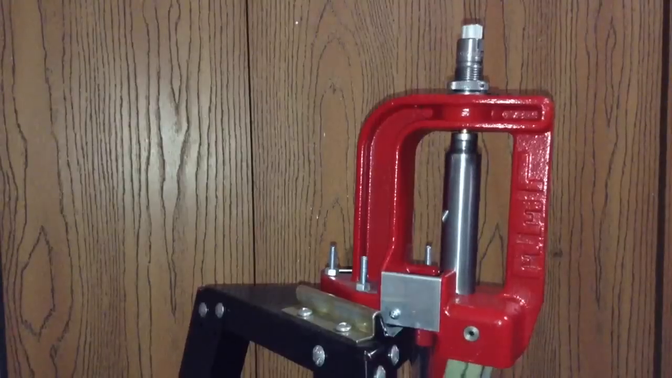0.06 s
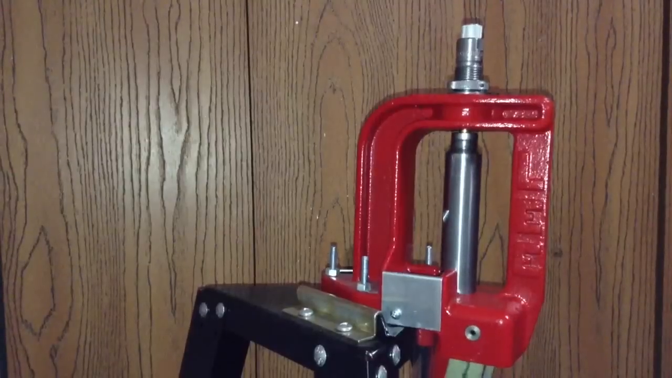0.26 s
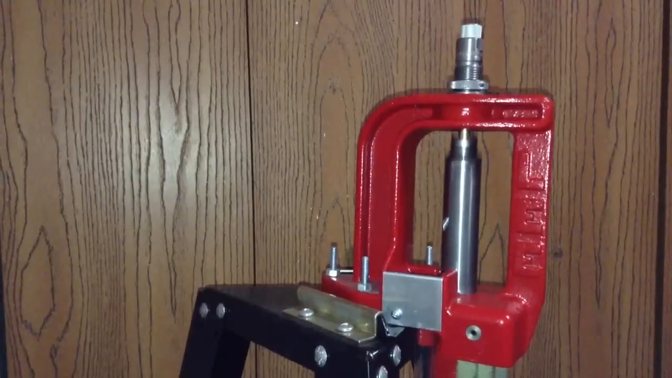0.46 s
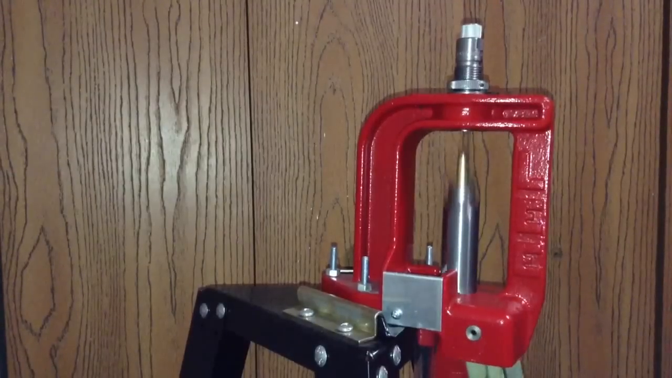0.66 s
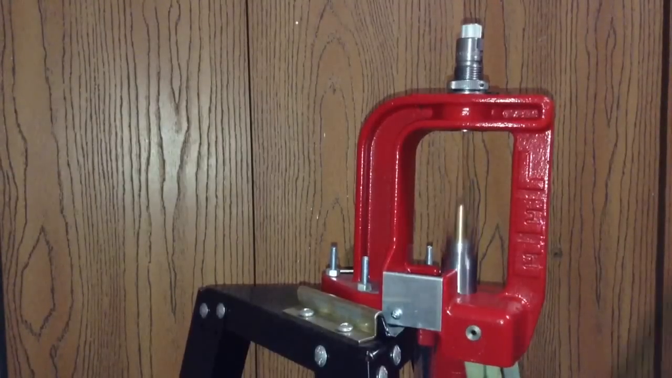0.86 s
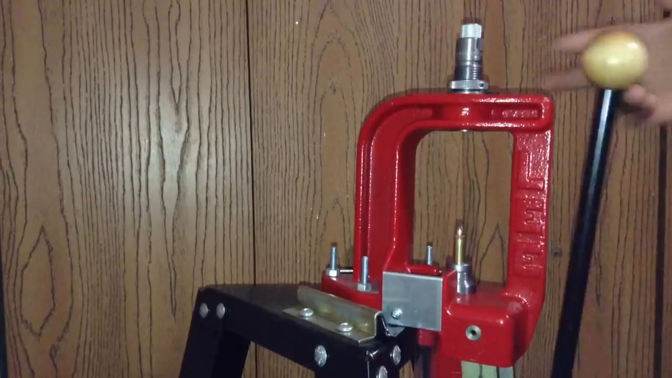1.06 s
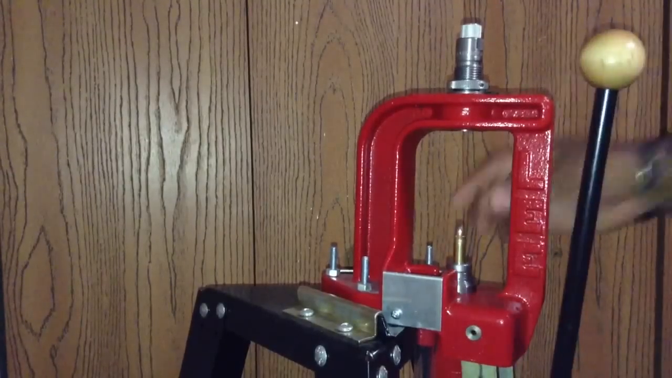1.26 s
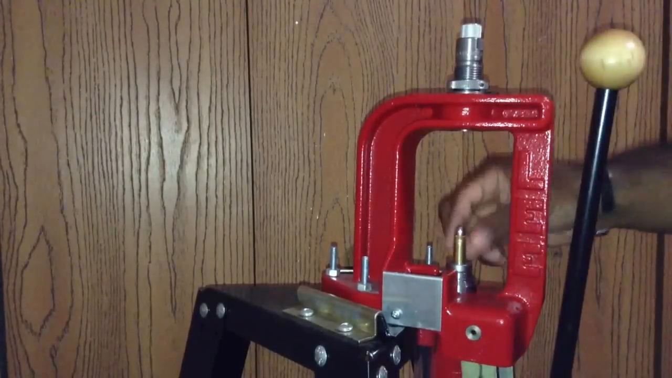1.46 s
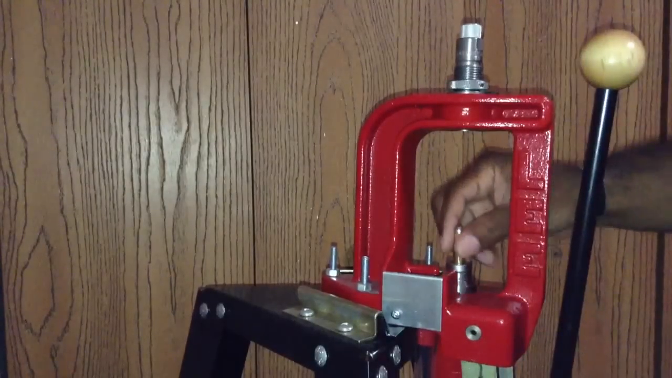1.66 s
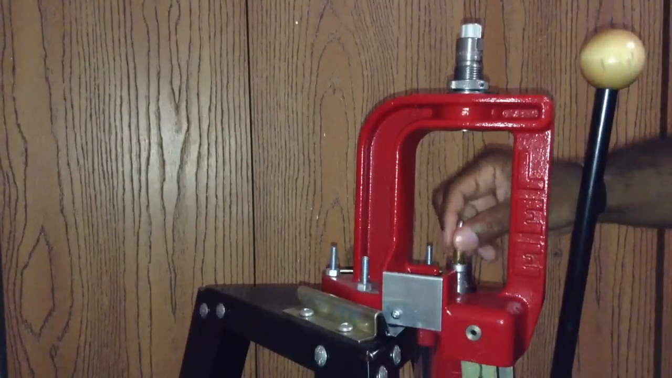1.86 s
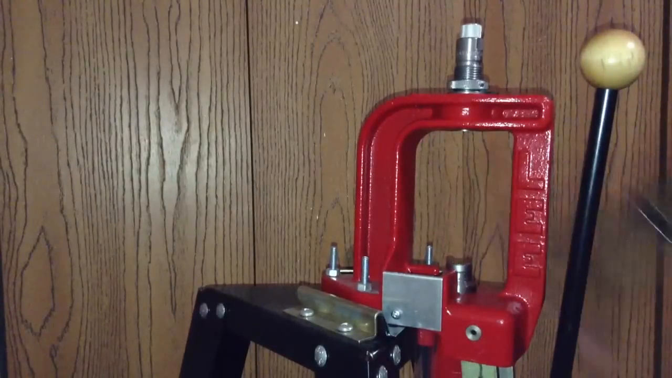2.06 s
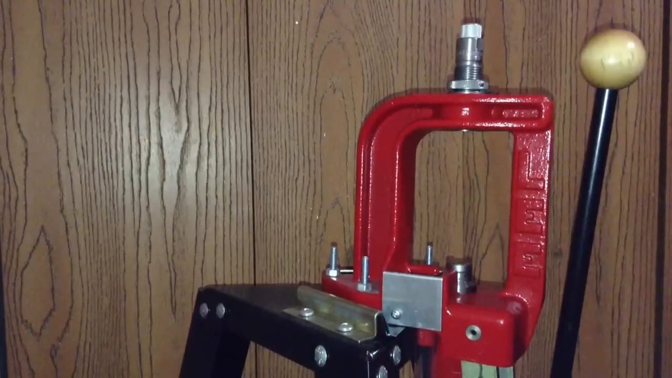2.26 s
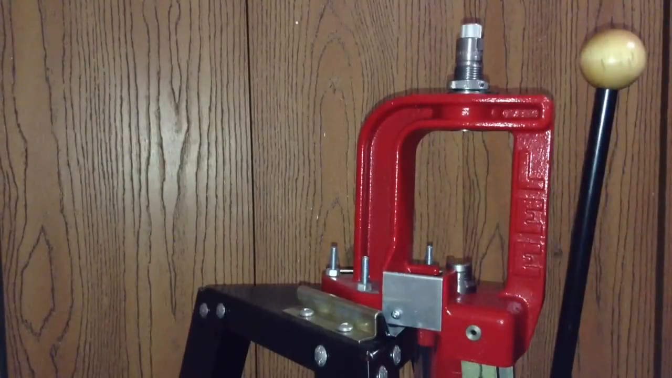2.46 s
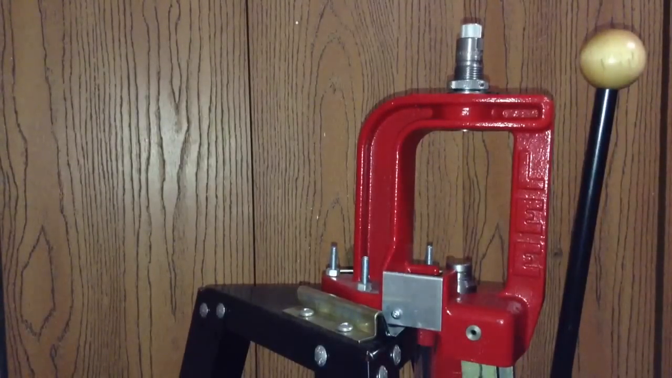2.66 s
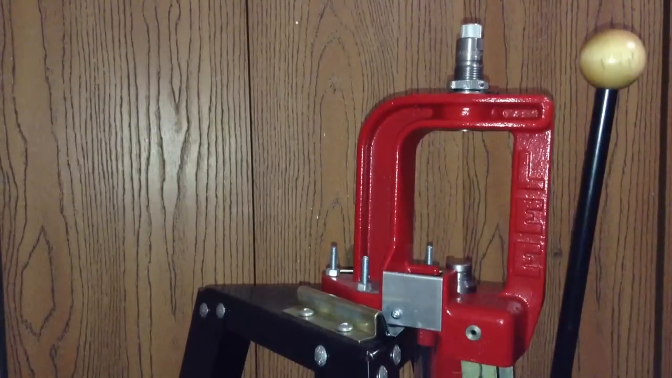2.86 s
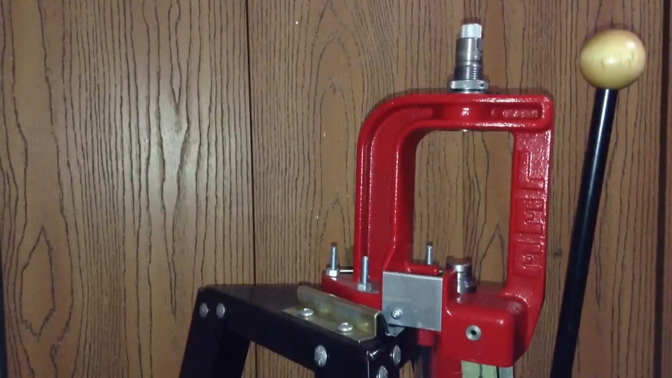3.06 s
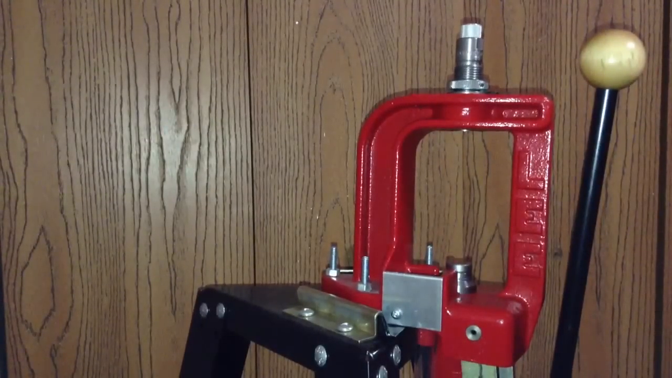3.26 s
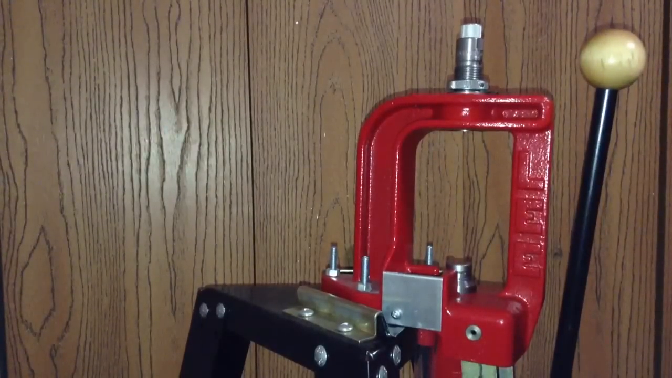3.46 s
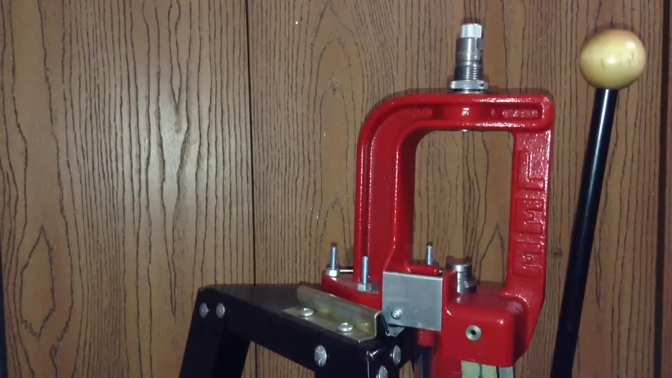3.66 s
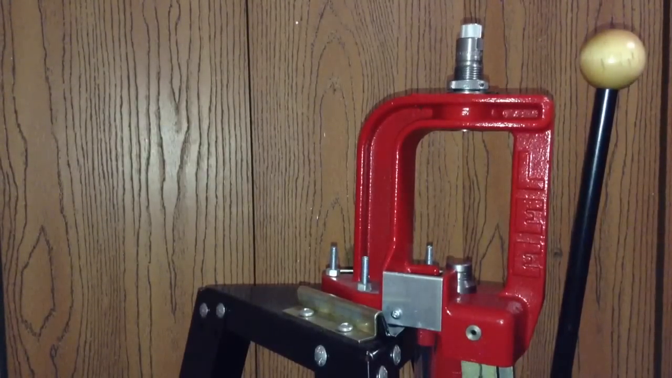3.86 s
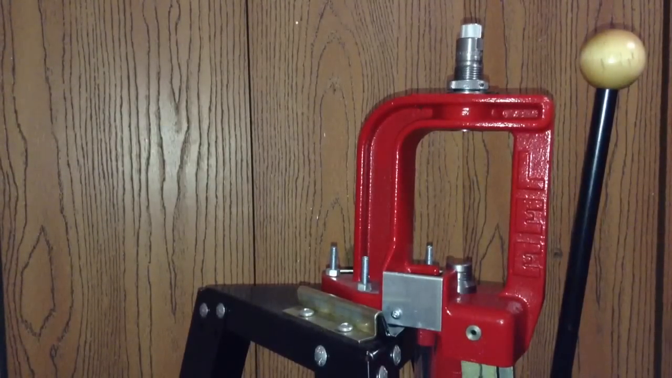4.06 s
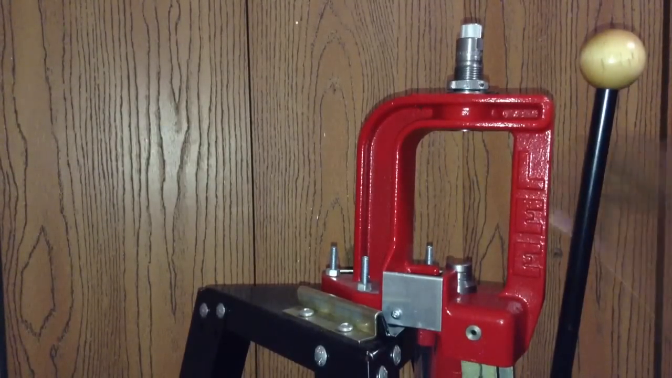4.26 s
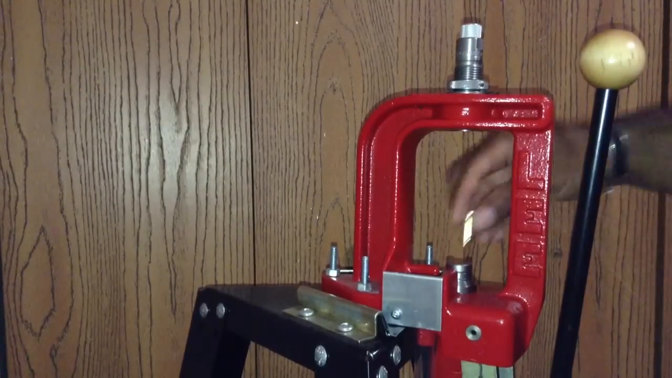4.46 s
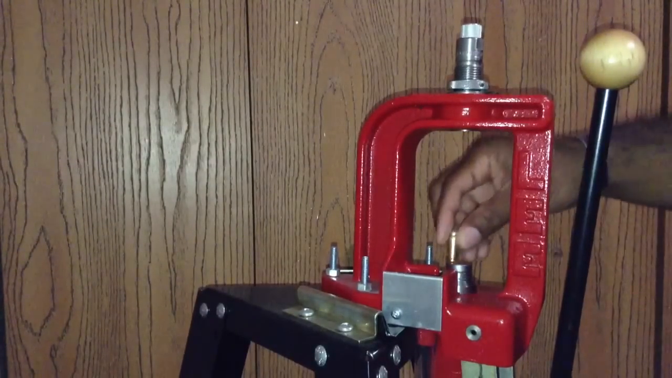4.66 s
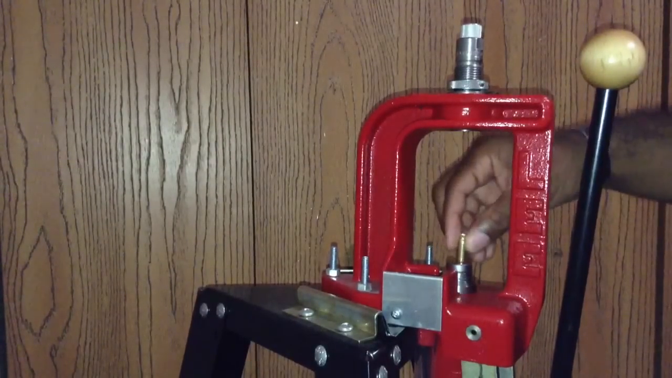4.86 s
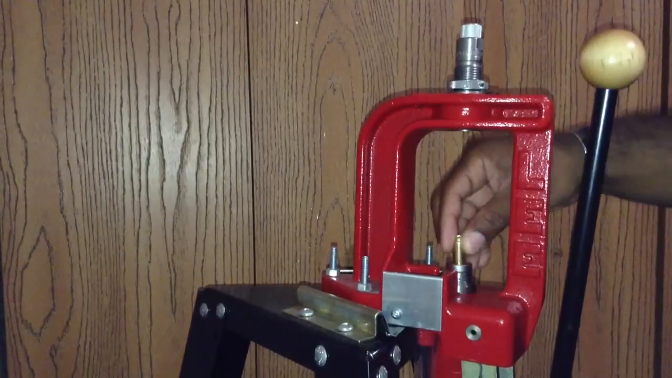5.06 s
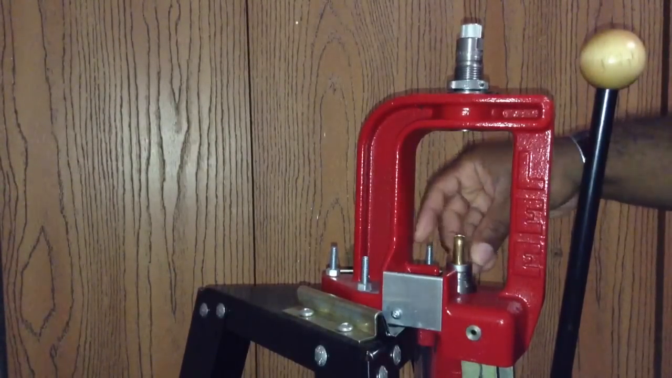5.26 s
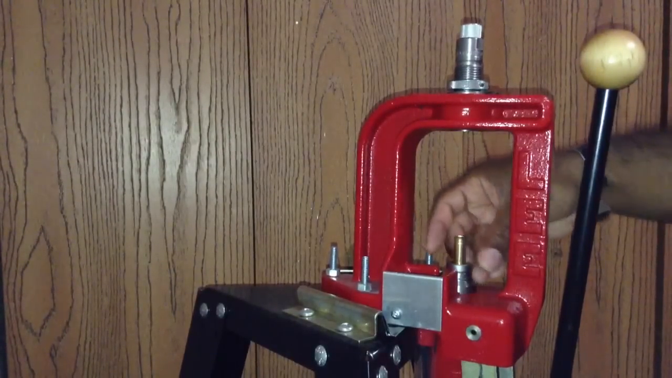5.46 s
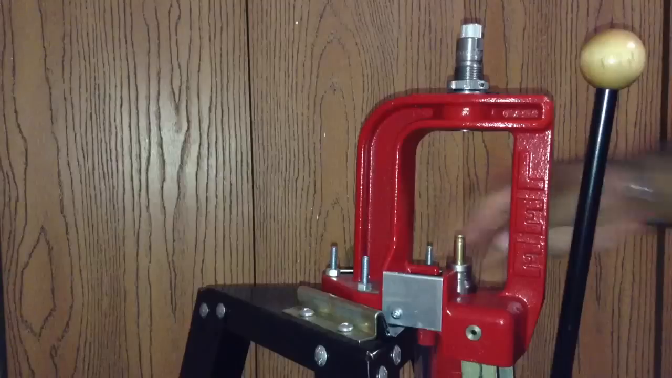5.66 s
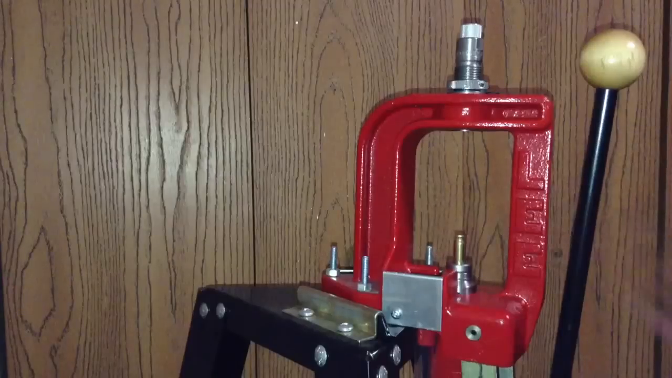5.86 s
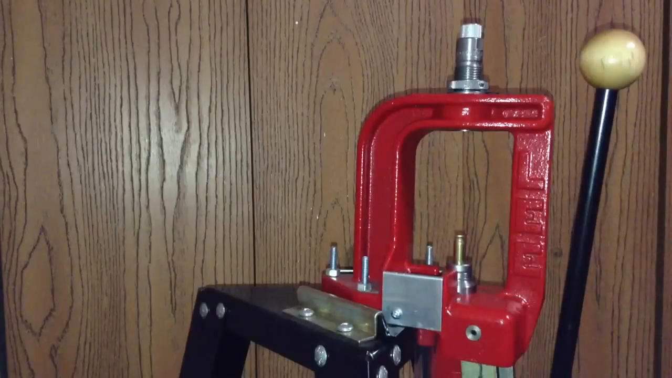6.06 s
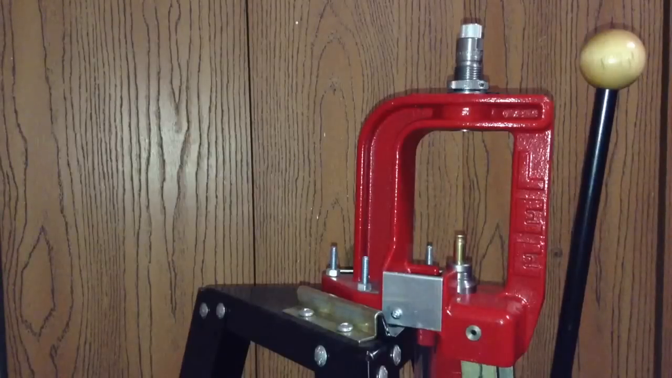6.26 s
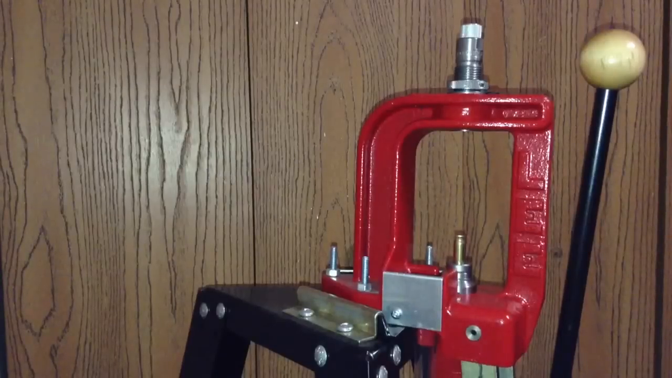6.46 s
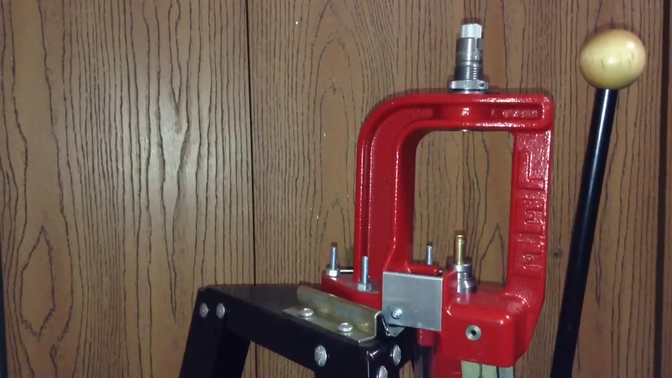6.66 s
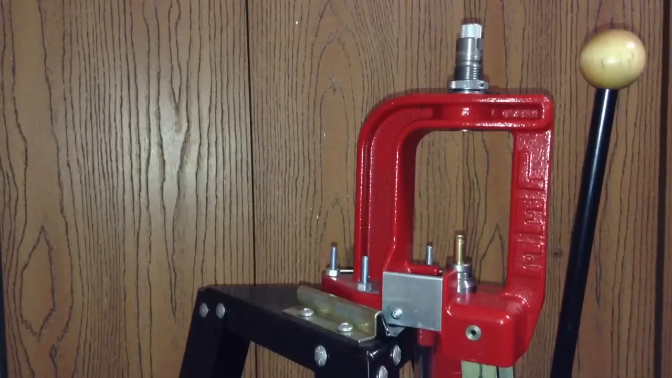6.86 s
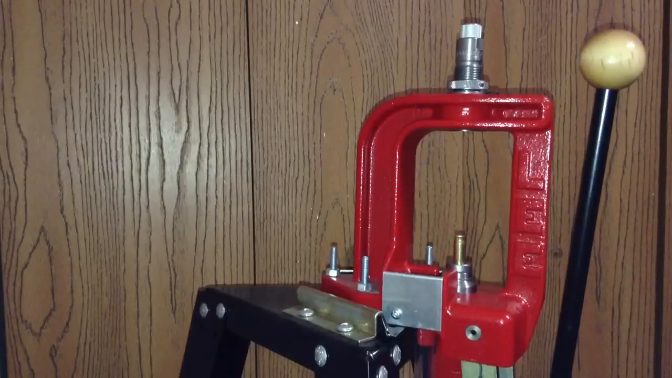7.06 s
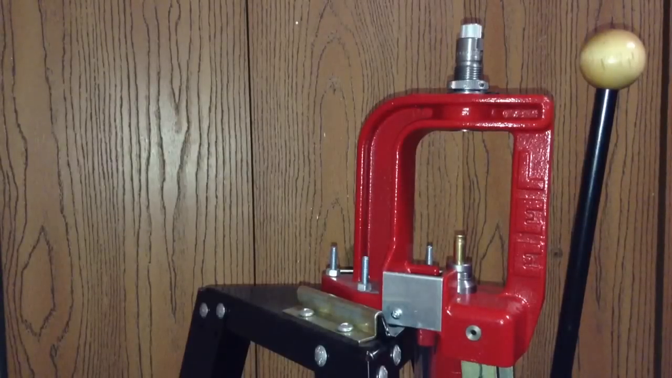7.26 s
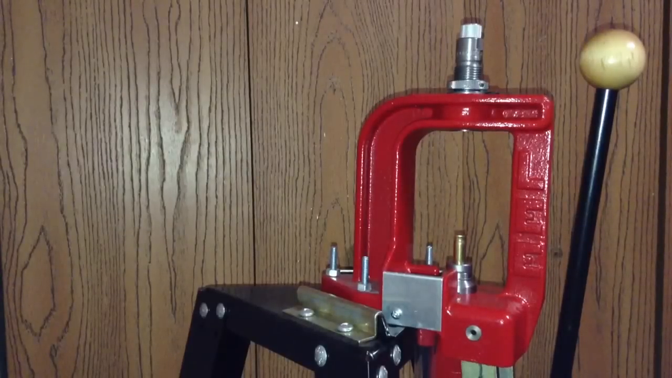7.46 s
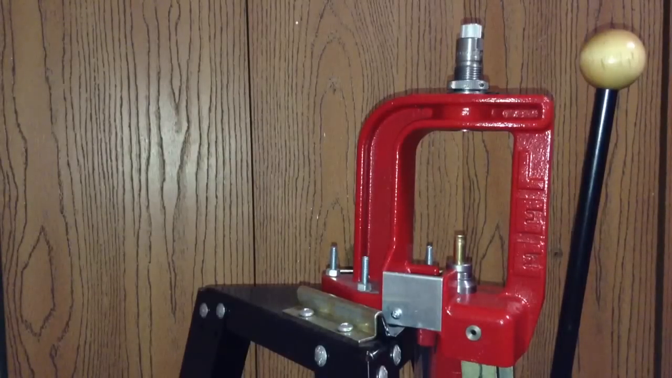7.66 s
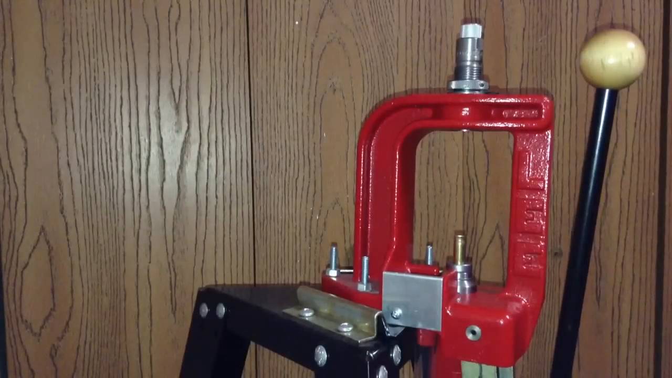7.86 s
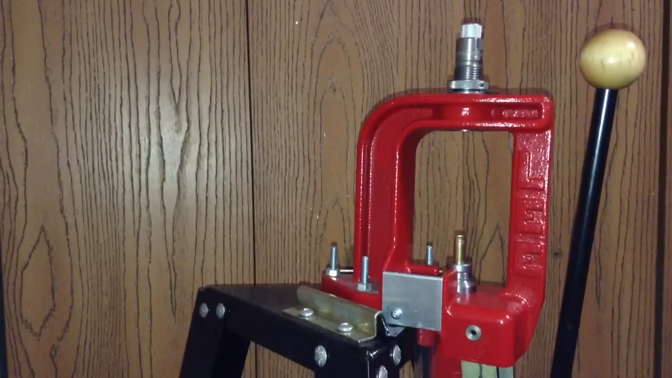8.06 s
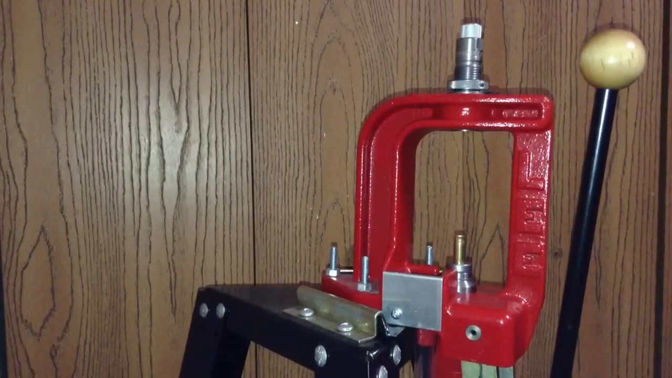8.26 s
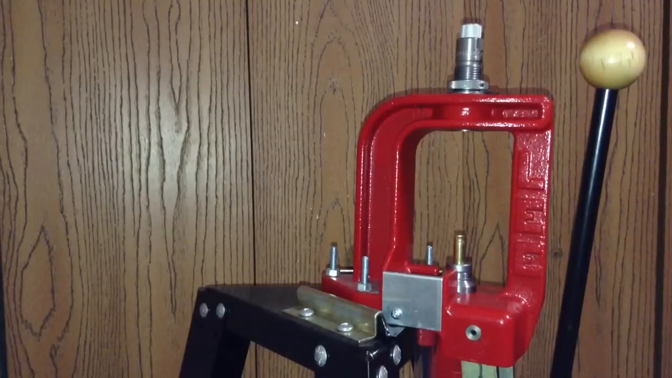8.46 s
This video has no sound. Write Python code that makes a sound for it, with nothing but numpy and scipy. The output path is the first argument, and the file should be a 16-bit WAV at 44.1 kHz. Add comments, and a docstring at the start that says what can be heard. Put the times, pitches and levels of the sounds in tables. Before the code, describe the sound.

Metal press clunks free with a tiny squeak, ram slides to a loud clang, then brass clicks, wooden bench knocks and faint cloth rustle.

```python
"""A clunk and a brief squeak: the ram of a steel-stand reloading press breaks free in a small panelled room.
It slides down and the handle hits its stop; brass clicks in the shell holder, things knock on the bench,
the next case goes in, then clothes rustle. Contacts are decaying noise shaped by a spectrum plus sine modes;
sliding and cloth are filtered trains of slips; the squeak is a wavering sine. Rumble and hiss run throughout.
"""
import sys
import numpy as np
from scipy import signal
from scipy.fft import rfft, irfft
from scipy.io import wavfile
from scipy.ndimage import uniform_filter1d

SR = 44100
rng = np.random.default_rng(int(sys.argv[2]) if len(sys.argv) > 2 else 0)


def materialize(psi):
    """Save the field psi as 16-bit PCM at rate SR to the path in sys.argv[1].

    A 1-D psi becomes a single channel; in a 2-D psi each row is a channel.
    """
    bounded = np.clip(np.atleast_2d(psi).T, -1, 1)
    quanta = np.round(bounded * 32767).astype(np.int16)
    wavfile.write(sys.argv[1], SR, quanta)


N = 376040

# Table levels are relative: each layer adds its own trim.
# Blows in the press: t/s, clang/dB, stand boom/dB, contact tick/dB, clang centre f/Hz, change per rebound/dB
PRESS_BLOWS = [(0.0, -33, -48, -49.5, 2340, -4.5), (0.086, -18.5, -24, -31, 2010, -3.5),
               (0.189, -35, -47, -44, 2350, -5.5), (0.359, -35, -37, -60.5, 965, -10),
               (0.451, -33, -54, -63, 2940, -12.5), (0.468, -25, -48, -46, 2280, -12.5),
               (0.477, -26, -39, -31, 2270, -12.5), (0.542, -34.5, -41.5, -47, 2180, -11),
               (1.107, -10.5, -19.5, -26.5, 3000, -2.5)]
# Knocks on the wooden bench: t/s, clack/dB, boom of the top/dB
BENCH_KNOCKS = [(2.772, -17.5, -44), (2.906, -38.5, -51), (2.988, -40, -55.5), (3.042, -43.5, -62.5),
                (3.082, -32.5, -61), (3.129, -31.5, -52), (3.215, -54, -58.5), (3.301, -6.5, -36),
                (3.602, -35.5, -52), (3.701, -40.5, -63)]
# Brass on the shell holder: t/s, scrape length/s, clink/dB, contact tick/dB, clink centre f/Hz
BRASS_TOUCHES = [(1.557, 0.065, -35, -44.5, 2370), (1.698, 0.0024, -26.5, -37, 2660),
                 (1.731, 0.031, -30, -39, 2780), (1.866, 0.028, -26, -31, 2460),
                 (4.670, 0.0016, -33, -35.5, 4270), (4.790, 0.027, -48, -70, 2800),
                 (4.849, 0.046, -37, -56.5, 2300), (4.892, 0.01, -34.5, -40, 2330),
                 (4.956, 0.031, -31.5, -44.5, 3560), (4.974, 0.055, -30, -40.5, 2370),
                 (5.031, 0.019, -35.5, -36, 3000)]
# Clear modes of the cast frame, stand, bench top, planks and brass case: f/Hz, level/dB, t60/s
FRAME_MODES = [(958, -12, .52), (1297, -14, .33), (1572, -7, .17), (1950, -9, .27), (2148, -14, .33),
               (2243, -11, .33), (2460, -11, .23), (3042, -2, .16), (3332, -2, .18), (3510, -12, .33),
               (3705, -6, .21), (3844, -16, .27)]
STAND_MODES = [(92, -10, .17), (143, 0, .26), (150, -20, 1.5), (170, -9, .3), (238, -3, .2), (275, 3, .27),
               (322, -16, .8), (371, -6, .25), (447, -13, .3), (538, -11, .45)]
BENCH_MODES = [(125.5, -14.5, .35), (171.7, -15.5, 0.13), (212.5, -7.5, 0.15), (236, 0.5, 0.28),
               (275.1, -3.5, 0.3), (328, -10.5, .12)]
PLANK_MODES = [(546, -9.5, 0.19), (1100, -4.5, 0.095), (1200, 1, .16), (1410, -10, .24), (1960, -10, .2),
               (2239, -5, 0.18), (3000, -4.5, .16), (3410, -16, .18), (3470, -8.5, 0.094)]
BRASS_MODES = [(1370, -5, .08), (2240, 0, .08), (2760, -2, .07), (3710, -4, .1), (4200, -4, .07)]
# Spectra of the crowded, short-lived modes: f/Hz, level/dB
PRESS_SPECTRUM = [(30, -39.5), (65, -35.5), (95, -2.5), (300, 5.5), (470, -1.5), (800, 0), (1300, 1),
                  (2200, 1.5), (3000, -5.5), (3800, -1.5), (4700, -4), (7500, -9.5), (10000, -13.5),
                  (15000, -19.5)]
BENCH_SPECTRUM = [(30, -34), (90, -17.5), (230, 1.5), (330, -7), (440, -5.5), (800, -5), (1120, 2.5),
                  (1600, -2), (2300, -3.5), (3700, -9.5), (4500, -14), (5800, -14), (9000, -28),
                  (11500, -43), (15000, -53.5)]
BRASS_SPECTRUM = [(100, -58), (750, -7.5), (1350, 1.5), (2300, 6.5), (3200, 1.5), (4200, -2.5),
                  (5300, -6.5), (7000, -8.5), (10000, -11), (13000, -23.5), (15500, -27)]
# Spectra of the sliding ram, the cloth and the background: f/Hz, level/dB
SLIDE_SPECTRUM = [(60, -46.5), (125, -13.5), (230, -10), (300, 1.5), (460, -28.5), (620, -6), (720, -9.5),
                  (1300, -2.5), (1700, 1.5), (2300, -4), (3600, -14.5), (5000, -16), (6000, -28.5),
                  (15000, -37)]
CLOTH_SPECTRUM = [(40, -36), (100, -20), (200, 5.5), (400, -4), (550, 4.5), (900, 5.5), (1500, 1),
                  (2500, -2.5), (4400, -0.5), (5800, -7.5), (10000, -9), (12500, -17), (15000, -18.5)]
FLOOR_SPECTRUM = [(15, -88), (25, -51.5), (48, -37.5), (64, -32.5), (148, -0.5), (183, -6), (274, -6),
                  (509, -12), (722, -12.5), (804, -7), (1170, -10), (1490, -18), (4150, -23), (13900, -24),
                  (15500, -24.5)]
# Ram sliding in its bore: t/s, level/dB
RAM_SLIDE = [(.57, -51.5), (.65, -52), (.73, -34.5), (.78, -39.5), (.86, -41), (.95, -57.5), (1.09, -66)]
# Squeak: start t/s, end t/s
SQUEAK_SPAN = (.190, .212)
# How hard the clothes rub: t/s, level/dB
CLOTH_EFFORT = [(6.1, -88), (6.26, -48.5), (6.36, -51.5), (6.4, -43.5), (6.5, -53), (6.55, -42.5),
                (6.67, -59), (6.87, -48.5), (7.36, -66), (7.48, -50), (7.99, -89), (8.03, -62.5),
                (8.12, -72), (8.22, -87), (8.36, -74), (8.5, -88)]
# Folds that snag and let go: t/s, scuff/dB, centre f/Hz
CLOTH_SNAGS = [(6.242, -41, 1010), (6.287, -53, 1040), (6.402, -30.5, 606), (6.54, -34, 1300),
               (6.739, -40, 1340), (7.05, -38, 720), (7.427, -45, 1400), (7.47, -40, 3560),
               (7.567, -44.5, 1850), (7.715, -49, 1010), (8.03, -60, 4200), (8.106, -51.5, 1250)]
# Reverberation: f/Hz, t60/s
ROOM_T60 = [(100, 0.77), (300, 0.33), (1000, 0.33), (2500, .28), (5000, 0.26), (12000, 0.21)]

BOOM_TOP_HZ, TICK_BOTTOM_HZ = 430, 4900  # register crossovers of the contacts
REBOUND_S, REBOUND_EXPONENT = .0045, 1.7  # linkage slack: rebound k lags by REBOUND_S * k ** REBOUND_EXPONENT
CLANG_T60_S, CLACK_T60_S, CLACK_HZ = .1, .072, 1090
TICK_DB_PER_CLACK_DB = 2.6
ROCK_S, ROCK_DB, ROCK_MAX_DB = .022, -4.5, -40.5  # second touch of a thing set down; cap on its clack
SCRAPE_DB, SCRAPE_TICK_DB, SCRAPE_FADE_DB_PER_S = -18, -14, -52  # against the clink and tick that start it
SQUEAK_MEAN_HZ, SQUEAK_DB = 8620, -40
BRISK_DB = -51  # reference effort, at which the cloth layers have the next levels
RUB_DB, FLAP_DB, HISS_DB = -53, -64, -56.5
FLAP_DB_PER_DB, HISS_DB_PER_DB = 1.7, 1.56  # per dB of effort
SNAG_HISS_DB = 2.5  # against the hiss level of that moment
FLOOR_RMS_DB = -68.5
BAND_EDGE_HZ = 15550
TIME = np.arange(N) / SR
RING = TIME[:SR * 3 // 5]  # time axis of one contact, s
GRID_HZ = np.fft.rfftfreq(8192, 1 / SR)


def amp(db):
    """Decibels to gain."""
    return 10 ** (np.asarray(db) / 20)


def unit(x):
    """Scales to rms 1."""
    return x / np.sqrt(np.mean(x ** 2) + 1e-20)


def burst(x):
    """Scales to the energy of 10 ms at rms 1."""
    return x / np.sqrt(np.sum(x ** 2) / (SR / 100) + 1e-20)


def read(points, hz):
    """Interpolates a table on a log-frequency axis."""
    f, value = np.transpose(points)
    return np.interp(np.log(hz + 1), np.log(f), value)


def level_at_time(points):
    """Interpolates a level table over the scene, silent outside it."""
    return np.interp(TIME, *np.transpose(points), left=-200, right=-200)


def add(mix, start_s, sound):
    """Mixes a sound in at start_s."""
    part = mix[max(round(start_s * SR), 0):][:len(sound)]
    part += sound[:len(part)]


def causal(gain):
    """Minimum-phase impulse response of a gain curve."""
    mirrored = np.r_[gain, gain[-2:0:-1]]
    log_gain = np.log(np.maximum(mirrored, 1e-5 * gain.max()))
    return np.fft.ifft(np.exp(np.conj(signal.hilbert(log_gain)))).real[:len(gain)]


def filtered(x, response):
    """Convolves and keeps the length."""
    return signal.fftconvolve(x, response)[:len(x)]


def registers(spectrum, low_hz, high_hz, order=8):
    """Splits a spectrum into low, middle and high impulse responses."""
    low = 1 / (1 + (GRID_HZ / low_hz) ** order)
    high = 1 - 1 / (1 + (GRID_HZ / high_hz) ** order)
    gain = amp(read(spectrum, GRID_HZ))
    return [causal(gain * np.sqrt(share)) for share in (low, (1 - low) * (1 - high), high)]


def voiced(response, centre_hz, lift_db, octaves):
    """Place and hardness of a contact favour one broad region of modes."""
    distance = np.log2((GRID_HZ + 1) / centre_hz) / octaves
    return filtered(response, causal(amp(lift_db * np.exp(-distance ** 2))))


def dying(t60_s):
    """Exponential decay."""
    return np.exp(-np.log(1000) * RING / max(t60_s, 1e-3))


def chatter(response, t60_s, rise_s=0.000092):
    """Ever weaker random micro-impacts excite all the crowded modes evenly."""
    count = 2 * (len(GRID_HZ) - 1)
    envelope = dying(t60_s) * (1 - np.exp(-RING / max(rise_s, 1e-5)))
    hits = rng.standard_normal(count) * envelope[:count]
    power = uniform_filter1d(abs(rfft(hits)) ** 2, size=70)
    even = filtered(hits, causal(1 / np.sqrt(abs(power) + 1e-12)))  # flattens broad spectral lumps
    return burst(filtered(even, response))


def ring(modes, rise_s, vary_db, detune=.004):
    """A body's clear modes as decaying sines, with chance level (vary_db), phase and detuning."""
    chance = rng.standard_normal((len(modes), 3))
    partials = np.zeros(len(RING))
    for (hz, db, t60_s), (level, phase, shift) in zip(modes, chance):
        tone = np.sin(2 * np.pi * (hz * (1 + detune * shift) * RING + phase))
        partials += amp(db + vary_db * level) * dying(t60_s) * tone
    return burst(partials * (1 - np.exp(-RING / max(rise_s, 1e-4))) ** 2)


def wander(size):
    """Smooth chance of rms 1 that changes over about size samples."""
    return unit(uniform_filter1d(uniform_filter1d(rng.standard_normal(N), size), size // 2))


def grains(per_s, spread_db):
    """Friction: a dense train of tiny slips of uneven size."""
    slips = rng.standard_normal(N) * (rng.random(N) < per_s / SR)
    return unit(slips * amp(spread_db * np.minimum(rng.exponential(1, N), 4)))


def patchy(x, patchy_db):
    """A moving contact colours the rubbing differently from moment to moment."""
    z = signal.stft(x, nperseg=512)[2]
    patches = uniform_filter1d(rng.standard_normal(z.shape), size=7, axis=0)
    patches = unit(uniform_filter1d(patches, size=8, axis=1))
    return unit(signal.istft(z * amp(patchy_db * patches), nperseg=512)[1][:N])


def scrape(length_s, per_s, spread_db):
    """A short run of small uneven contacts that fades, then stops with the sliding."""
    size = rng.exponential(1, len(RING))
    present = rng.random(len(RING)) < per_s / SR
    sign = rng.choice([-1., 1.], len(RING))
    contacts = unit(sign * amp(spread_db * np.minimum(size, 3)) * present)
    return contacts * amp(SCRAPE_FADE_DB_PER_S * RING) / (1 + (RING / max(length_s, 1e-3)) ** 20)


def rebounds(start_s, change_db, count=4):
    """A blow and its rebounds, each weaker and after a longer gap: t/s, level/dB."""
    later = [(start_s + REBOUND_S * k ** REBOUND_EXPONENT, k * change_db) for k in range(1, count)]
    return [(start_s, 0)] + later


def floor():
    """Steady room rumble and microphone hiss: noise shaped by one spectrum."""
    gain = amp(read(FLOOR_SPECTRUM, np.fft.rfftfreq(N, 1 / SR)))
    return amp(FLOOR_RMS_DB) * unit(irfft(rfft(rng.standard_normal(N)) * gain, N))


def room(x, gap_s=0.0013, build_s=0.0017):
    """Close panelled walls: sparse reflections, the treble dying first."""
    taps = rng.choice([-1., 1.], len(RING)) * (rng.random(len(RING)) < 4000 / SR)
    hz, t, z = signal.stft(taps, SR, nperseg=256)
    decay = np.exp(-np.log(1000) * t / read(ROOM_T60, hz)[:, None])
    tail = signal.istft(z * decay, SR, nperseg=256)[1][:len(RING)]
    tail = tail * np.clip((RING - gap_s) / build_s, 0, 1)
    return filtered(x, tail / np.linalg.norm(tail))


def clothes():
    """Fibres slip in clumps, folds flap and snag; lows and highs grow faster with effort than the middle."""
    effort_db = level_at_time(CLOTH_EFFORT) - BRISK_DB
    flap_db = FLAP_DB + FLAP_DB_PER_DB * effort_db
    hiss_db = HISS_DB + HISS_DB_PER_DB * effort_db
    slips = patchy(grains(per_s=3500, spread_db=3), patchy_db=3) * amp(2 * wander(size=700))
    low, middle, high = registers(CLOTH_SPECTRUM, 880, 4800)
    out = amp(flap_db) * unit(filtered(slips, low))
    out += amp(RUB_DB + effort_db) * unit(filtered(slips, middle))
    out += amp(hiss_db) * unit(filtered(slips, high))
    _, fold, _ = registers(CLOTH_SPECTRUM, 101, 4300)
    for s, scuff_db, hz in CLOTH_SNAGS:
        body = voiced(fold, hz, lift_db=12, octaves=.66)
        add(out, s, amp(scuff_db - 7.5) * chatter(body, t60_s=.1, rise_s=.002))
        torn_db = np.interp(s, TIME, hiss_db) + SNAG_HISS_DB
        add(out, s, amp(torn_db) * chatter(high, t60_s=0.21, rise_s=0.0073))
    return out


def bench():
    """Hard things knock on wood and rock once: a short clack over the hollow note of the bench top."""
    low, middle, high = registers(BENCH_SPECTRUM, BOOM_TOP_HZ, TICK_BOTTOM_HZ)
    clack = voiced(middle, CLACK_HZ, lift_db=3, octaves=.7)
    wood, top = np.zeros((2, N))
    rocks = [(s + ROCK_S, min(clack_db + ROCK_DB, ROCK_MAX_DB), boom_db + ROCK_DB)
             for s, clack_db, boom_db in BENCH_KNOCKS]
    for s, clack_db, boom_db in BENCH_KNOCKS + rocks:
        softness = amp(-.42 * clack_db)  # a gentler knock stays in contact longer: duller, slower start
        body = filtered(clack, causal(1 / (1 + (GRID_HZ * softness / 24000) ** 4)))
        add(wood, s, amp(clack_db - 9.0) * chatter(body, CLACK_T60_S, rise_s=.00006 * softness ** 2))
        add(wood, s, amp(clack_db - 19) * ring(PLANK_MODES, rise_s=.0005, vary_db=1.5))
        add(wood, s, amp(TICK_DB_PER_CLACK_DB * clack_db - 9.5) * chatter(high, t60_s=0.032))
        add(wood, s, amp(boom_db - 8.0) * chatter(low, t60_s=0.1196))
        add(top, s, amp(boom_db + 6.0) * ring(BENCH_MODES, rise_s=.004, vary_db=0.0))
    return wood, top


def brass():
    """A case held in the fingers clicks and scrapes in the slot of the shell holder."""
    _, middle, high = registers(BRASS_SPECTRUM, BOOM_TOP_HZ, TICK_BOTTOM_HZ)
    out = np.zeros(N)
    for s, length_s, clink_db, tick_db, hz in BRASS_TOUCHES:
        body = voiced(middle, hz, lift_db=7, octaves=.5)
        modes = ring(BRASS_MODES, rise_s=.0003, vary_db=2, detune=.012)
        add(out, s, amp(clink_db - 16.0) * chatter(body, t60_s=0.13, rise_s=0.00082))
        add(out, s, amp(clink_db - 24) * modes)
        add(out, s, amp(tick_db - 9.5) * chatter(high, t60_s=0.021))
        slips = scrape(length_s, per_s=1300, spread_db=2)
        scrape_db = clink_db + SCRAPE_DB
        layers = (scrape_db, body), (scrape_db - 2.5, modes), (tick_db + SCRAPE_TICK_DB, high)
        for db, response in layers:
            add(out, s, amp(db) * filtered(slips, response / np.linalg.norm(response)))
    return out


def squeak():
    """The round sticks and slips as it leaves the die: a brief, very high, wavering sine."""
    start_s, end_s = SQUEAK_SPAN
    position = 2 * (TIME - start_s) / (end_s - start_s) - 1  # -1 to 1 across the squeak
    swell = np.sqrt(np.clip(1 - position ** 2, 0, 1))
    turns = np.cumsum(SQUEAK_MEAN_HZ * (1 + 0.004 * wander(size=60))) / SR
    return amp(SQUEAK_DB) * swell * np.sin(2 * np.pi * turns)


def ram():
    """The ram rubs unevenly down its bore; the slips also sound the modes of the frame."""
    slips = patchy(grains(per_s=2400, spread_db=2.5), patchy_db=3) * amp(1.5 * wander(size=600))
    rub = unit(filtered(slips, causal(amp(read(SLIDE_SPECTRUM, GRID_HZ)))))
    sing = unit(filtered(slips, ring(FRAME_MODES, rise_s=0.0014, vary_db=-3.0)))
    return amp(level_at_time(RAM_SLIDE) - 2.0) * (rub + amp(-14) * sing)


def press():
    """Steel meets steel: a tick, the cast frame clangs, and the stand's boom swells more slowly."""
    low, middle, high = registers(PRESS_SPECTRUM, BOOM_TOP_HZ, TICK_BOTTOM_HZ)
    metal, stand = np.zeros((2, N))
    for start_s, clang_db, boom_db, tick_db, hz, change_db in PRESS_BLOWS:
        body = voiced(middle, hz, lift_db=7, octaves=0.5)
        for s, db in rebounds(start_s, change_db):
            add(metal, s, amp(clang_db + db - 8.5) * chatter(body, CLANG_T60_S))
            add(metal, s, amp(clang_db + db - 19) * ring(FRAME_MODES, rise_s=.0005, vary_db=1.5))
            add(metal, s, amp(tick_db + db - 2) * chatter(high, t60_s=.085))
            add(metal, s, amp(boom_db + db - 6.5) * chatter(low, t60_s=0.05, rise_s=0.0019))
            add(stand, s, amp(boom_db + db - 4.5) * ring(STAND_MODES, rise_s=0.0054, vary_db=0.0))
    # the bolted stand shivers on: a long noise tail, treble rolled off
    shiver = rng.standard_normal(len(RING)) * dying(t60_s=0.91)
    shiver = filtered(shiver / np.linalg.norm(shiver), causal(1 / (1 + (GRID_HZ / 2500) ** 2)))
    return metal, stand + amp(-21.5) * filtered(metal, shiver)


def scene():
    """Everything shares one small room; the low booms reach the microphone mostly direct."""
    metal, stand = press()
    wood, top = bench()
    small = brass()
    rubbing = ram() + squeak() + clothes()
    send = amp(-7.5) * metal + amp(-8.5) * wood + amp(-6) * small
    send = send + amp(-6.5) * rubbing + amp(-18.5) * (stand + top)
    direct = metal + stand + wood + top + small + rubbing
    return (direct + room(send) + floor())[None]


def record(dry):
    """The recorder's band limit: a linear-phase lowpass."""
    lowpass = signal.firwin(401, BAND_EDGE_HZ, window=("kaiser", 8), fs=SR)
    return signal.oaconvolve(dry, lowpass[None], "same")


dry = scene()
out = record(dry)
materialize(out)
```